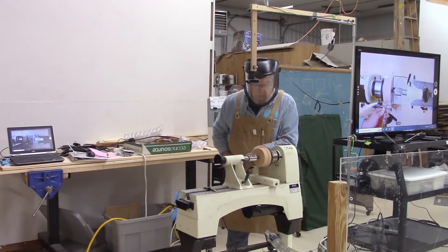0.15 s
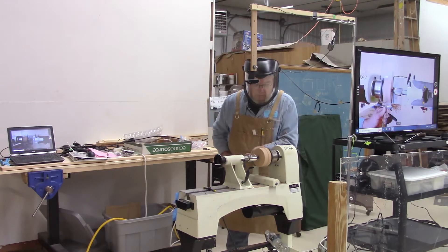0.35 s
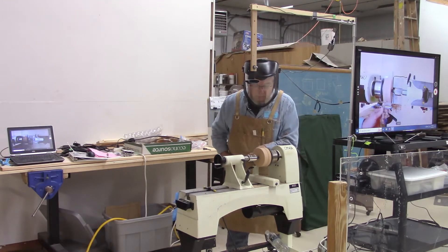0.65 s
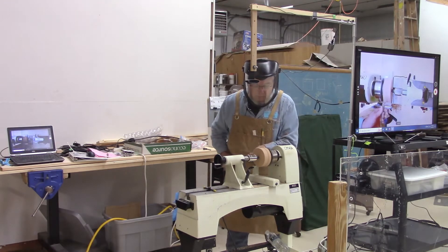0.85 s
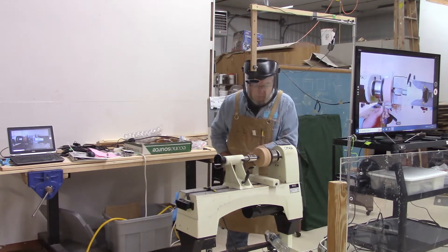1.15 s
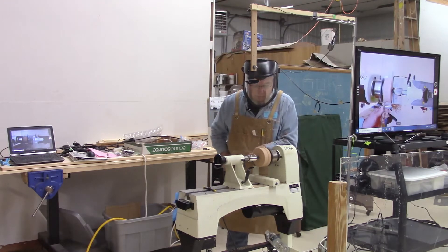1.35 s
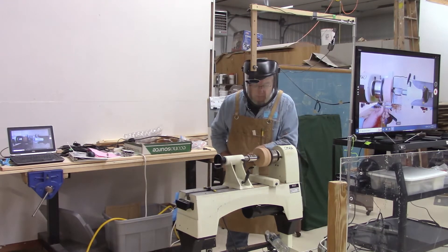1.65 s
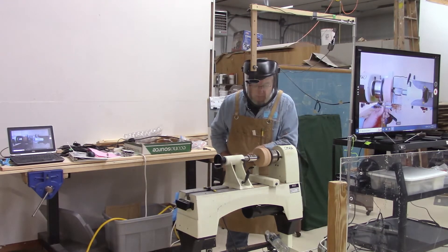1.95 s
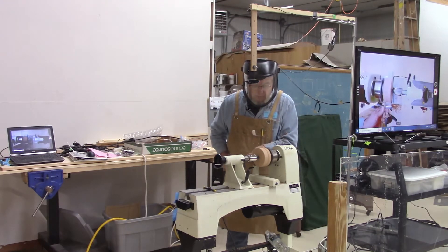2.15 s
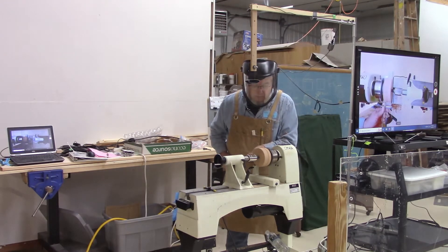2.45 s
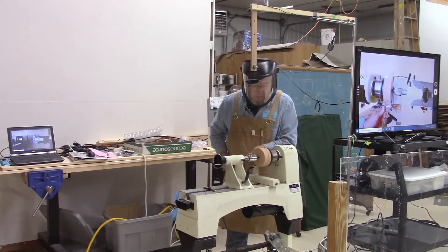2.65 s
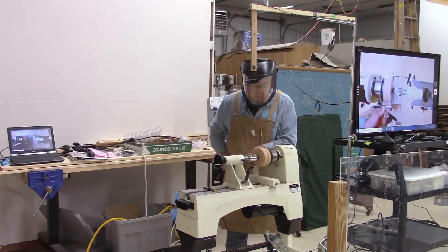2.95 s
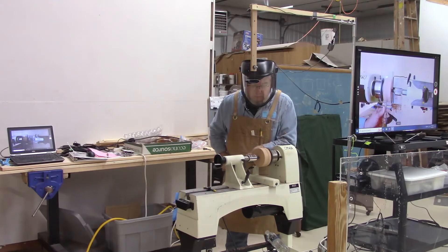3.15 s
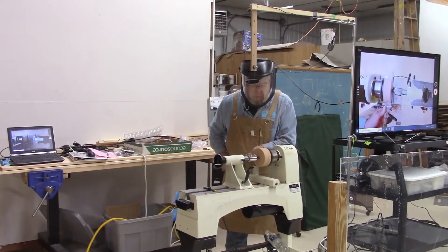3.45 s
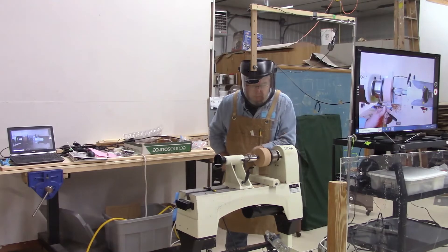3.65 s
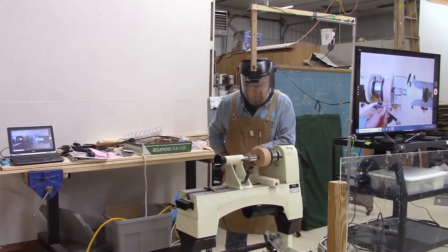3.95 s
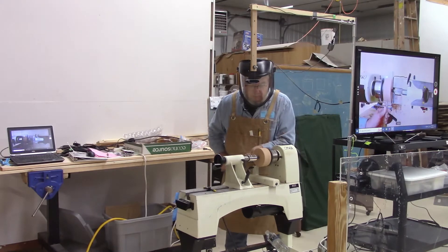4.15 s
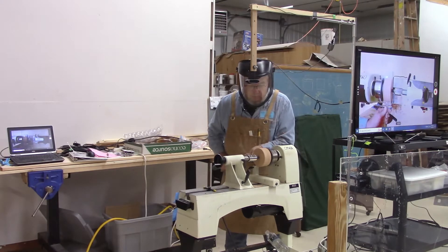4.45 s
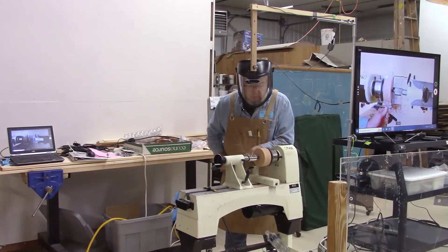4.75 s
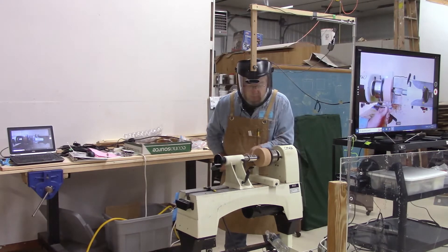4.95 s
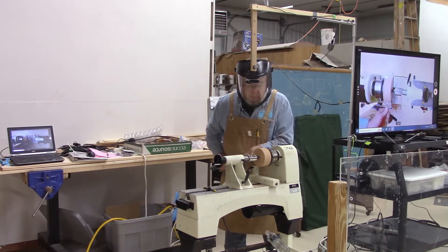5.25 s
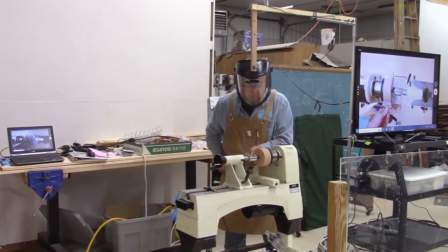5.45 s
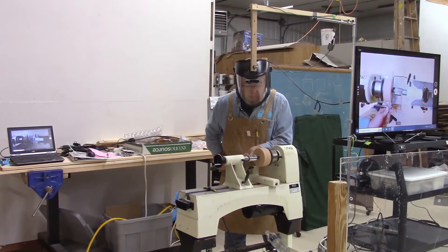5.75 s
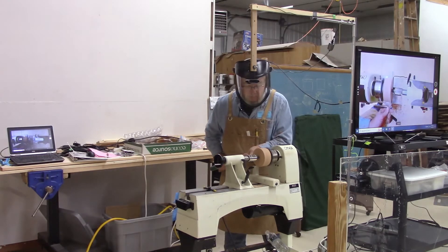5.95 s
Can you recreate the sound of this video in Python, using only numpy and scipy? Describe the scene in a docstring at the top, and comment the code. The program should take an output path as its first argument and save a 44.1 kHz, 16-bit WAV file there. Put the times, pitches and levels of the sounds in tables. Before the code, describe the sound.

A gouge shears a spinning wooden blank on a lathe, a rough throbbing hiss that pauses briefly, then resumes as one long pass in a hard-walled workshop.

```python
"""Gouge shaving wood on a lathe

A hand-held gouge shears a spinning wooden blank in a hard-walled workshop, heard from across the room.
One pass ends and the room dies away; a long pass follows, the spindle slowing at first, then speeding up.
The cut is torn noise, throbbing with each turn; its ringing shifts as the edge travels along the wood.
Thumps are short fading tones, the motor and shop air are shaped noise, and thin hums are drifting tones.
The room adds echoes of noise that die away at a different speed for each frequency."""
import sys
import numpy as np
from scipy import signal
from scipy.fft import rfft, irfft, next_fast_len
from scipy.io import wavfile
from scipy.ndimage import uniform_filter1d, map_coordinates

SR = 44100
rng = np.random.default_rng(int(sys.argv[2]) if len(sys.argv) > 2 else 0)


def store_wav(level_fs):
    """Save 16-bit WAV to argv[1]."""
    pcm = np.round(np.clip(np.atleast_2d(level_fs), -1, 1) * 32767)
    wavfile.write(sys.argv[1], SR, pcm.T.astype(np.int16))


N = 269892
TIME = np.arange(-SR, N) / SR  # one second of lead-in, so the room is full at the start

# Motor and shop air, shape only: pitch_hz, relative_level_db_per_hz
IDLE_SPECTRUM = [(15, -69), (25, -41), (70, -2.5), (107, 0.5), (148, -2.5), (184, 1), (315, -7.5),
                 (586, -36), (652, -25), (878, 0), (1090, -22), (1970, -4.5), (3660, -30), (5790, -11),
                 (15700, -56)]
IDLE_LEVEL_DB = -47.5
# Thin wavering tones low in the machine: start_s, start_pitch_hz, start_level_db, end_pitch_hz, end_level_db
HUMS = [(.75, 247, -51.5, 251, -44.5), (3.3, 281, -45.5, 273, -40), (4.9, 502, -36, 486, -30)]

# Knocks of the tool on its rest: start_s, level_db
REST_KNOCKS = [(0.803, -29), (1.279, -37), (1.596, -35), (1.823, -34), (1.999, -27.5), (2.088, -33),
               (2.318, -27), (2.597, -29), (2.741, -27.5), (2.96, -31), (3.116, -31), (3.228, -27),
               (4.974, -32)]
# Tones of the bench inside each knock: pitch_hz, relative_level_db, fade_by_60_db_s
BENCH_TONES = [(117, -4, 0.081), (195, 5.5, 0.12)]

# How fast the spindle turns: time_s, turns_per_s
SPINDLE_SPEED = [(0.0, 21.5), (0.7, 20.1), (1.0, 21.15), (1.3, 18.75), (1.6, 17.45), (2.0, 17.2),
                 (2.4, 17.8), (2.8, 17.3), (3.2, 17.15), (3.45, 18.9), (3.7, 22.1), (4.1, 21.35),
                 (4.5, 21.7), (4.9, 21.45), (5.3, 21.15), (5.7, 22.7), (6.12, 23.5)]
# Whether the tool is on the wood: time_s, gain_db
TOOL_CONTACT = [(.168, 0), (.18, -6), (.2, -38), (.685, -36), (.7, -19), (.712, -11), (.717, 0), (.74, 0)]
# Where the edge is along the work: time_s, place_number (0 to 5)
EDGE_TRAVEL = [(.4, 0), (.6, 1), (1.3, 1), (2.2, 2), (3.2, 2), (3.6, 3), (4.4, 3), (4.9, 4), (5.2, 4),
               (5.6, 5)]
# How hard the edge shears, and the blank's ring over it: time_s, shear_level_db, ring_over_shear_db
PRESSURE = [(0, -20, 1), (.17, -17.5, -2), (.76, -17, -4.5), (.9, -21, -1), (1.2, -18, -3), (1.54, -16, -3),
            (1.9, -18, -4), (2.22, -19.5, -2.5), (2.75, -18.5, -3), (3.0, -19.5, -2), (3.27, -18.5, -2.5),
            (3.45, -21.5, -2.5), (3.72, -21, -2.5), (3.95, -19, -3), (4.3, -19.5, -0.5), (4.75, -19.5, -3),
            (5.05, -18.5, -2), (5.3, -18.5, -2), (5.75, -20.5, 0.5), (6.12, -22, -0.5)]
# Moments when the edge bites deeper: start_s, strength_db (before each band takes its share)
BITES = [(0.7378, 1), (0.8855, 17.5), (1.0311, -4), (1.0795, -13), (1.1304, -10), (1.241, 12), (1.2806, 4),
         (1.7146, 11), (1.774, 1), (1.8298, -2), (1.884, 17), (2.0034, 11), (2.6036, 3), (2.686, 11),
         (2.744, 14), (3.1508, -3), (3.35, 16), (4.3294, 8), (6.028, 10), (6.0762, 17)]
# Throb of the blank's ring: cycles_per_turn, swing_db, phase_rad
BLANK_THROB = [(1, 0.6, 3), (2, 0.95, -4)]
# Balance at each place: fizz_db, lathe_body_db, bench_rumble_db (all over the shearing),
# once_per_turn_db (run-out), twice_per_turn_db (grain direction)
PLACE_BALANCE = [(-18, -20, -13.5, 0.73, -4), (-16, -27.5, -26.5, 1, -0.5), (-16.5, -22, -26.5, 0.21, 1.2),
                 (-18, -20.5, -32, 0.7, 1), (-14.5, -16.5, -27, 0.31, -0.4), (-13.5, -13.5, -34, 1.8, 0)]
# Fibres tearing between the resonances: pitch_hz, relative_level_db_per_hz
FIBRE_SPECTRUM = [(25, -61), (60, -39), (110, -18), (220, -31), (330, -14), (700, -11.5), (1500, -10.5),
                  (2300, -18.5), (3800, -14.5), (5000, -18.5), (6500, -14.5), (8500, -21.5), (11500, -22),
                  (15800, -27)]
# Low resonances of lathe body and bench, one list a place: pitch_hz, width_hz, relative_level_db
LATHE_RESONANCES = [
    [(102, 19, -35), (134, 12, -30), (325, 13, -3), (370, 9.7, -6.5), (540, 18, -5)],
    [(118, 13, -20), (200, 10, -21), (255, 9, -13), (312, 28, -10), (363, 11, -7), (542, 10.6, -1.5),
     (738, 18, -3)],
    [(125, 12, -8), (180, 12, -22.5), (246, 6, -39), (299, 29, -7.5), (376, 14, -8.5), (733, 16, 0),
     (776, 9.5, -14)],
    [(115, 9.8, -10), (190, 13, -15), (250, 5.5, -42), (287, 6.2, -11), (324, 10, -9), (604, 38, -7.5),
     (740, 10, -2)],
    [(119, 23, -15), (183.8, 13, -17), (251.4, 4.3, -12), (334, 18, -9), (440, 11, -15), (755, 9.9, -11)],
    [(113, 14, -16), (184, 9.3, -14.5), (338, 11, -10), (419, 9.1, -7), (745, 10, -29), (785, 11, -21)],
]
# Resonances of tool and blank at six places along the work: pitch_hz, width_hz, relative_level_db
TOOL_AND_BLANK_0 = [(790, 90, -3), (1180, 30, -18), (1710, 40, -6.5), (2450, 70, -12), (3220, 45, -12),
                    (4300, 79, -7), (4680, 140, -3.5), (5180, 72, -20), (5500, 220, -1), (5800, 59, -2),
                    (5900, 47, -11), (6650, 110, -7), (7120, 140, -6), (7450, 91, -18), (7870, 43, -17),
                    (9050, 45, -24), (9710, 150, -33), (11150, 52, -18)]
TOOL_AND_BLANK_1 = [(819, 26, 4.5), (1120, 26, -18), (1400, 78, -6.5), (1820, 137, -3), (2977, 66, -6),
                    (3330, 76, -7), (4450, 100, 0), (4824, 190, 2), (5540, 68, -4), (5940, 41, -25),
                    (6360, 280, -13), (6900, 43, -13), (7360, 65, -14), (8000, 84, -14), (8700, 180, -20),
                    (9050, 51, -14), (9900, 37, -14.5), (10660, 47, -13.5), (11800, 33, -29)]
TOOL_AND_BLANK_2 = [(522, 60, -6), (817, 43, 4), (1135, 106, -3), (1720, 176, -3), (3010, 85, -7),
                    (3300, 92, -8), (3540, 44, -19), (4480, 200, 0.5), (4840, 86, 4), (5140, 140, 0),
                    (5060, 50, -0.5), (5574, 120, 3.5), (5870, 59, -8), (6370, 200, -6), (6820, 34, -19.5),
                    (6965, 190, -3.5), (7700, 26, -16), (8770, 450, -19), (10640, 140, -14)]
TOOL_AND_BLANK_3 = [(842, 28, 3.5), (1171, 57, -6), (1830, 230, -5), (2290, 21, -15), (2650, 79, -16),
                    (2967, 41, -5), (3174, 45, -7), (3350, 25, -7), (4040, 35, -5), (4420, 160, -6),
                    (4910, 26, -0.5), (5100, 89, -5), (5470, 48, -2.5), (5820, 29, -4.5), (6500, 56, -9),
                    (7130, 48, -8.5), (8050, 120, -19), (9850, 180, -23), (10500, 29, -26),
                    (10800, 240, -20), (11300, 28, -21)]
TOOL_AND_BLANK_4 = [(815, 57, 3), (1290, 31, -4.5), (1756, 80, -1.5), (2027, 37, -1.5), (2470, 21, -9.5),
                    (2666, 52, -9), (3080, 45, -9), (3250, 44, -6.5), (3900, 24, -19), (3720, 28, -8),
                    (4080, 38, -2), (4300, 34, -13), (4340, 30, -2), (4480, 24, -3.5), (5090, 86, -3),
                    (5650, 53, -2), (5840, 120, -15), (5970, 120, -3.5), (6560, 42, -18), (6700, 93, -8),
                    (7150, 15, -15), (7140, 37, -7.5), (7800, 140, -16), (10100, 170, -26)]
TOOL_AND_BLANK_5 = [(815, 29, 5.5), (1124, 49, -4), (1400, 57, -7), (1850, 290, -4.5), (2910, 89, -6.5),
                    (3230, 38, -5), (3500, 17, -20), (3700, 44, -12), (3960, 47, -4), (4340, 26, -7),
                    (4500, 41, -7), (4900, 33, -6), (5060, 22, -7), (5370, 110, -6), (5920, 130, -3.5),
                    (6120, 100, -6), (6530, 41, -21), (6700, 91, -14), (6800, 80, -15), (7100, 29, -25),
                    (7810, 71, -11), (9840, 85, -22), (10700, 43, -14.5)]
BODY_FOLLOWS = 0.11  # share of the pressure swings that reaches lathe and bench

# How long the room rings: pitch_hz, fade_by_60_db_s
ROOM_FADE = [(100, 0.31), (320, 2.7), (800, 1.43), (2000, 1.5), (3500, 1.16), (5000, 0.84), (8000, 0.69),
             (12000, 0.21)]
# Gain of the second echo, which makes left and right differ: pitch_hz, gain_db
STEREO_WIDTH = [(60, -33), (125, -30), (250, -36), (500, -28.5), (1000, -32.5), (2000, -21.5), (4400, -15),
                (8000, -15), (12000, -16), (15000, -44)]
ROOM_DB, NEAR_WALLS_FADE_S = -3.5, 0.16  # near walls: time to fade by 60 dB
TOP_HZ = 15700


def amp(db):
    """Turn a level in dB into a gain."""
    return 10 ** (np.asarray(db) / 20)


def unit(x):
    """Scale to an average strength (rms) of 1."""
    return x / np.sqrt(np.mean(x ** 2) + 1e-20)


def along(points, hz):
    """Read values between (pitch, value) points, with pitch on a log scale."""
    f, v = np.transpose(points)
    return np.interp(np.log(hz + 1), np.log(f + 1), v)


def curves(rows):
    """Draw one straight-line curve over time for each column after the first."""
    s, *columns = np.transpose(rows)
    return [np.interp(TIME, s, column) for column in columns]


def wobble(rate):
    """Make a smooth random curve through `rate` random points a second."""
    points = rng.standard_normal(int(len(TIME) * rate / SR) + 4)
    return map_coordinates(points, [np.arange(len(TIME)) * rate / SR])


def filtered(x, response):
    """Multiply each frequency in a sound by the gain that `response` gives it."""
    size = next_fast_len(x.shape[-1] + 8192)
    spectrum = rfft(x, size) * response(np.fft.rfftfreq(size, 1 / SR))
    return irfft(spectrum, size)[..., :x.shape[-1]]


def above(hz, edge_hz):
    """Give the share of power that lies above a soft edge."""
    return hz ** 8 / (hz ** 8 + edge_hz ** 8)


def kicks(strengths, seconds):
    """Make sudden rises that sink back exponentially."""
    t = np.arange(SR // 10) / SR
    shape = np.exp(-t / seconds) * (1 - np.exp(-t / 0.00032))
    return signal.fftconvolve(strengths, shape)[:len(TIME)]


def idle():
    """Motor and shop air: steady noise shaped by frequency, with a slightly wavering level."""
    noise = rng.standard_normal(len(TIME))
    shaped = filtered(noise, lambda hz: amp(along(IDLE_SPECTRUM, hz)))
    return amp(IDLE_LEVEL_DB + 1.5 * wobble(13)) * unit(shaped)


def hum():
    """Slightly unsteady pure tones that fade in under the cut and drift until the end."""
    out = 0
    for start, hz_start, db_start, hz_end, db_end in HUMS:
        hz, db = curves([(start, hz_start, db_start), (N / SR, hz_end, db_end)])
        fade = np.clip((TIME - start) / 0.077, 0, 1)
        level = np.sqrt(2) * amp(db + 3.0 * wobble(11))
        turns = np.cumsum(hz + 2.47 * wobble(7.2)) / SR
        out = out + fade * level * np.sin(2 * np.pi * turns)
    return out


def thumps():
    """Dull knocks of the tool on its rest set the bench ringing in short, fading tones."""
    out = np.zeros(len(TIME) + SR)
    t = np.arange(SR // 5) / SR
    ring = sum(amp(db - 60 * t / t60) * np.sin(2 * np.pi * hz * t) for hz, db, t60 in BENCH_TONES)
    knock = ring * (1 - np.exp(-t / 0.01))  # soft start
    for start, db in REST_KNOCKS:
        out[SR + round(start * SR):][:len(t)] += amp(db) * knock
    return out[:len(TIME)]


def ringing(modes):
    """Tearing plus resonances, added in power; each is kept wide enough to sound like noise, not a whistle."""
    widened = [(c, max(w, c / 100), db) for c, w, db in modes]

    def gain(hz):
        power = amp(2 * along(FIBRE_SPECTRUM, hz))
        for centre, width, db in widened:
            spread = (hz * width) ** 2
            power = power + amp(2 * db) * spread / ((centre ** 2 - hz ** 2) ** 2 + spread)
        return np.sqrt(power)
    return gain


def tearing(patchy_db, snap, snaps_per_s, skip_db, skips_per_s):
    """Fibres parting: patchy noise, sharp-starting snaps, and skips where the edge loses the wood."""
    z = signal.stft(rng.standard_normal(len(TIME) + 512), nperseg=256)[2]
    patches = uniform_filter1d(rng.standard_normal(z.shape), size=5, axis=0)  # smooth over frequency
    patches = uniform_filter1d(patches, size=8, axis=1)  # smooth over time
    x = signal.istft(z * amp(patchy_db * unit(patches)), nperseg=256)[1][:len(TIME)]
    when, size, lose = rng.random((3, len(TIME)))
    snaps = kicks(snap * size * (when < snaps_per_s / SR), 0.0033)
    # Turned backwards in time: a skip deepens slowly and ends at once
    skips = kicks(size * (lose < skips_per_s / SR), 0.0063)[::-1]
    return unit(x * (1 + snaps) * amp(-skip_db * skips))


def band_shares(hz):
    """Split the cut into shearing, blank ring, chip fizz, lathe body and bench rumble."""
    deep, low, mid, high = [above(hz, edge) for edge in (220, 450, 2600, 7600)]  # edges in Hz
    return np.sqrt(np.abs([mid - high, low - mid, high, deep - low, 1 - deep]))


def cut():
    """The edge tears fibres; tool and blank ring by where it stands, and each turn presses harder at one side."""
    raw = tearing(patchy_db=1.64, snap=0.83, snaps_per_s=69, skip_db=5, skips_per_s=12)

    # Blend the ringing of the two nearest places
    place, = curves(EDGE_TRAVEL)
    sets = [TOOL_AND_BLANK_0, TOOL_AND_BLANK_1, TOOL_AND_BLANK_2,
            TOOL_AND_BLANK_3, TOOL_AND_BLANK_4, TOOL_AND_BLANK_5]
    nearness = np.clip(1 - np.abs(place - np.arange(len(sets))[:, None]), 0, 1)
    rung = sum(nearness[k] * filtered(raw, ringing(modes + LATHE_RESONANCES[k]))
               for k, modes in enumerate(sets))

    # Even out each band, so the level curves alone set the slow changes
    bands = filtered(rung, band_shares)
    bands = bands / np.sqrt(uniform_filter1d(bands ** 2, size=SR // 3, axis=1) + 1e-12)

    shear_db, blank_db = curves(PRESSURE)
    usual_db = shear_db[SR:].mean()
    push_db = shear_db - usual_db
    fizz_db, body_db, bench_db, once_db, twice_db = np.transpose(PLACE_BALANCE) @ nearness

    # The angle of the turning blank drives the throb
    angle = 2 * np.pi * np.cumsum(curves(SPINDLE_SPEED)[0]) / SR
    angle = angle - angle[SR]
    edge_db = once_db * np.cos(angle + 2.9) + twice_db * np.cos(2 * angle + 3.76)
    edge_db = edge_db + 0.5 * np.cos(4 * angle + 0.3)
    swing_db = sum(db * np.cos(k * angle + phase) for k, db, phase in BLANK_THROB)

    bites = np.zeros(len(TIME))
    for start, db in BITES:
        bites[SR + round(start * SR)] = amp(db)
    bite = kicks(bites, 0.004)
    hand_db = 0.093 * wobble(11)  # the grip is never quite steady

    levels = amp([push_db + edge_db,
                  push_db + blank_db + swing_db,
                  push_db + fizz_db + 1.9 * edge_db,
                  BODY_FOLLOWS * push_db + body_db + 0.76 * wobble(5.1),
                  BODY_FOLLOWS * push_db + bench_db + 1.6 * wobble(25)])
    bite_shares = np.array([[0.3], [0.18], [0.3], [0.05], [0.08]])  # the bright parts jump most
    levels = levels * (1 + bite * bite_shares)
    contact_db, = curves(TOOL_CONTACT)
    return amp(usual_db + hand_db + contact_db) * np.sum(levels * bands, axis=0)


def shop(x):
    """Two unrelated room echoes: near walls die fast, the tail at its own speed for each frequency.
    Tool and turner keep moving, so each stretch of sound meets a new pattern of echoes."""
    hop = SR // 4
    out = np.zeros((2, len(x) + 3 * SR))
    padded = np.pad(x, (hop, 2 * hop))
    window = np.sin(np.pi * np.arange(2 * hop) / (2 * hop))  # stretches overlap by half
    for start in range(0, len(x) + hop, hop):
        hz, t, z = signal.stft(rng.standard_normal((2, SR)), SR, nperseg=256)
        fall = amp(-60 * t / along(ROOM_FADE, hz)[:, None]) + 0.46 * amp(-60 * t / NEAR_WALLS_FADE_S)
        fall = fall / np.linalg.norm(fall, axis=1, keepdims=True)
        tail = signal.istft(z * fall, SR, nperseg=256)[1]
        tail = tail / np.linalg.norm(tail, axis=1, keepdims=True)
        stretch = padded[start:start + 2 * hop] * window
        echo = signal.fftconvolve(stretch[None], tail, axes=1)
        out[:, start:start + echo.shape[1]] += echo
    delay = SR // 200  # the nearest wall adds under two metres to the path
    return out[:, hop - delay:][:, :len(x)]


def scene():
    """Add up the sources and the room for two close-set microphones that differ mostly in the room's treble."""
    dry = cut() + thumps() + idle()
    near, other = shop(dry)
    mid = dry + amp(ROOM_DB) * near + hum()
    side = filtered(other, lambda hz: amp(along(STEREO_WIDTH, hz)))
    return np.array([mid + side, mid - side])[:, SR:]  # drop the lead-in


def record(dry):
    """Round the tallest peaks, weaken the deep bass and remove everything from TOP_HZ up."""
    soft = dry / (1 + np.abs(dry) ** 8) ** (1 / 8)
    return filtered(soft, lambda hz: (hz < TOP_HZ) * np.sqrt(np.sqrt(above(hz, 46))))


dry = scene()
out = record(dry)
store_wav(out)
```